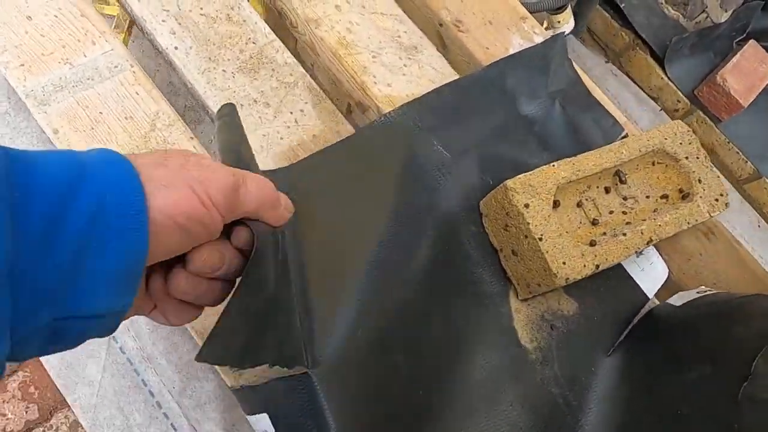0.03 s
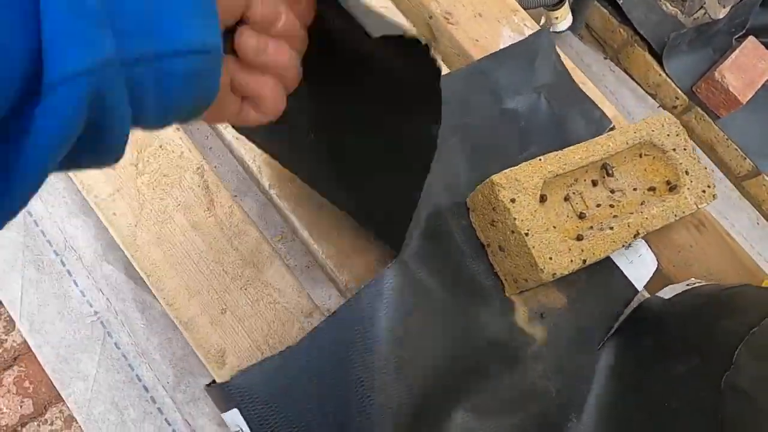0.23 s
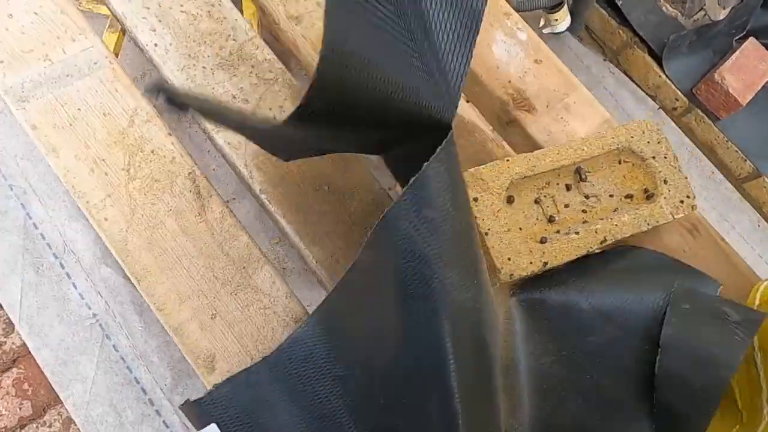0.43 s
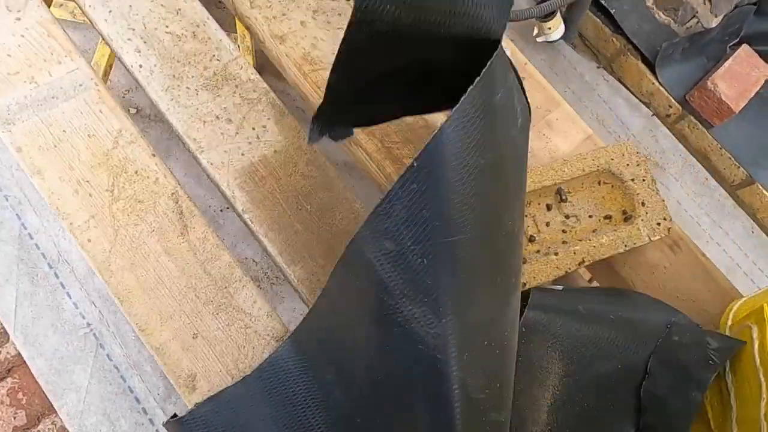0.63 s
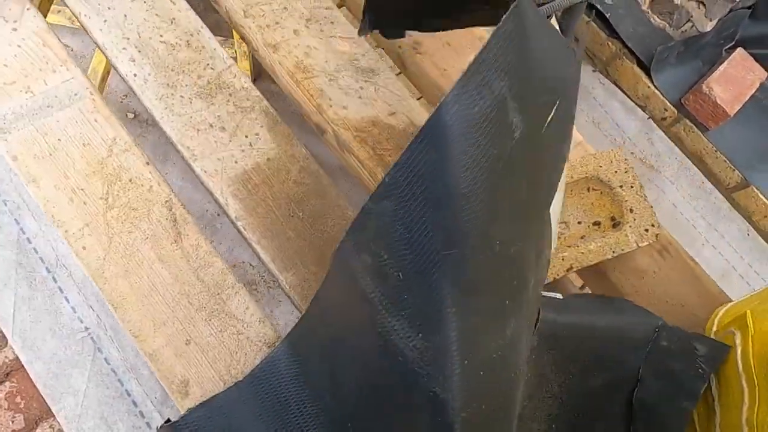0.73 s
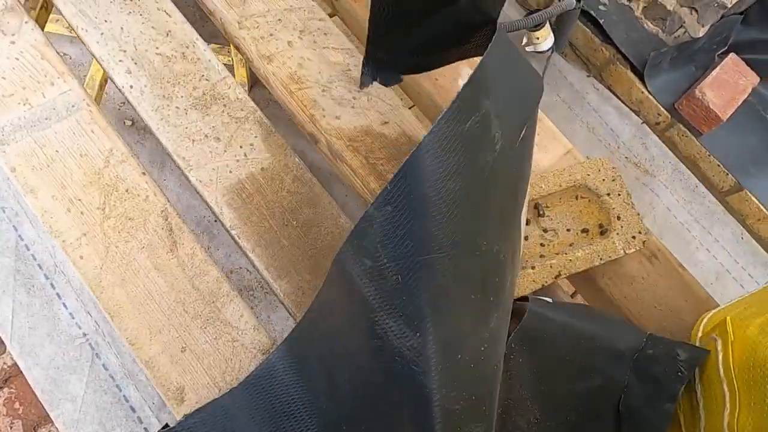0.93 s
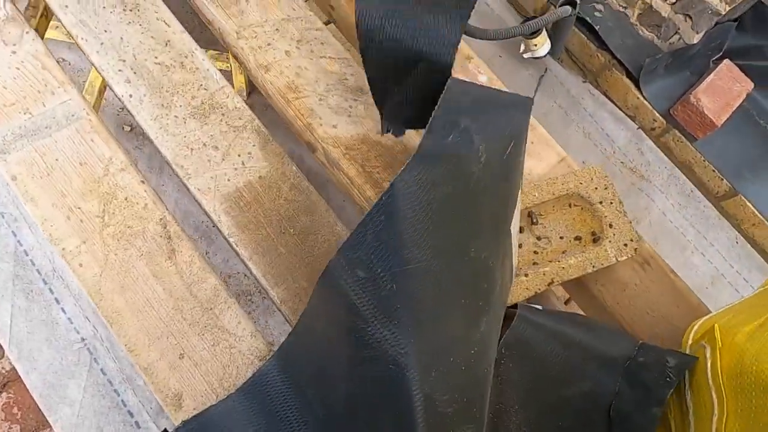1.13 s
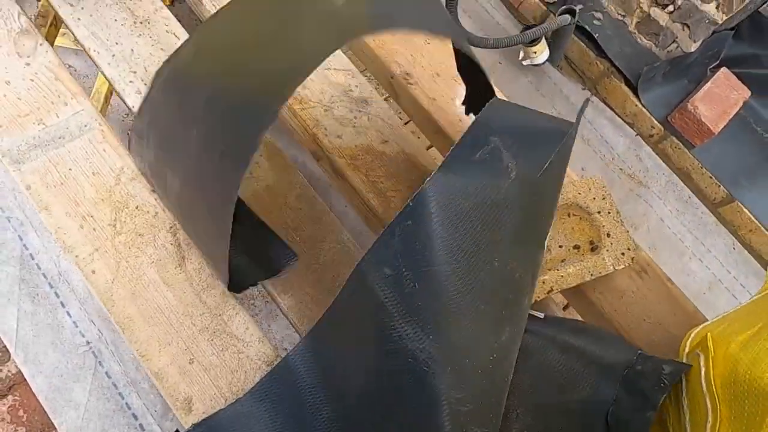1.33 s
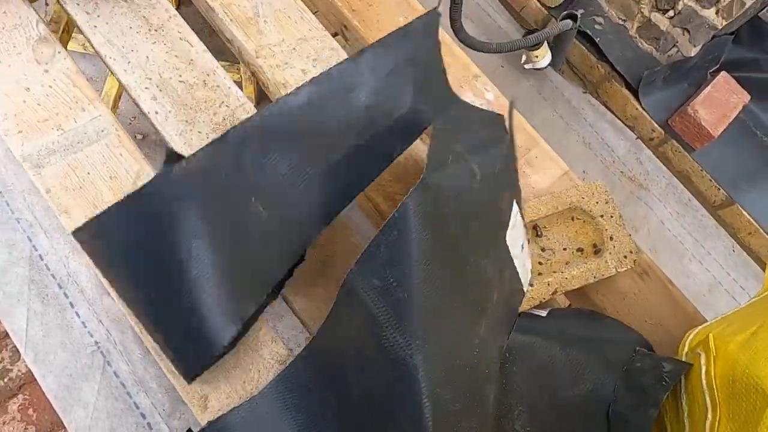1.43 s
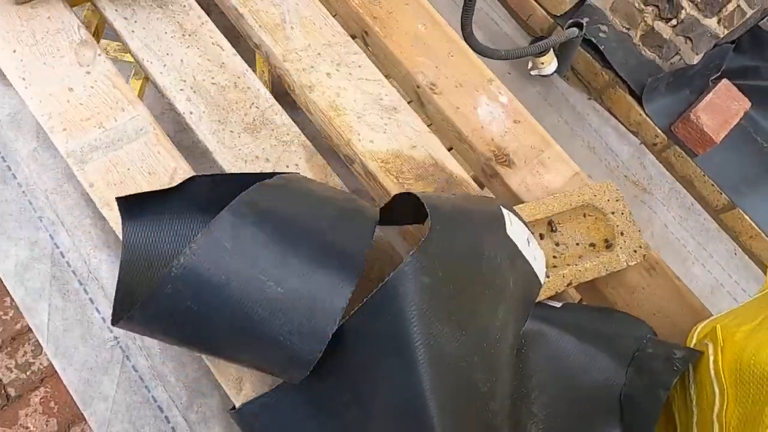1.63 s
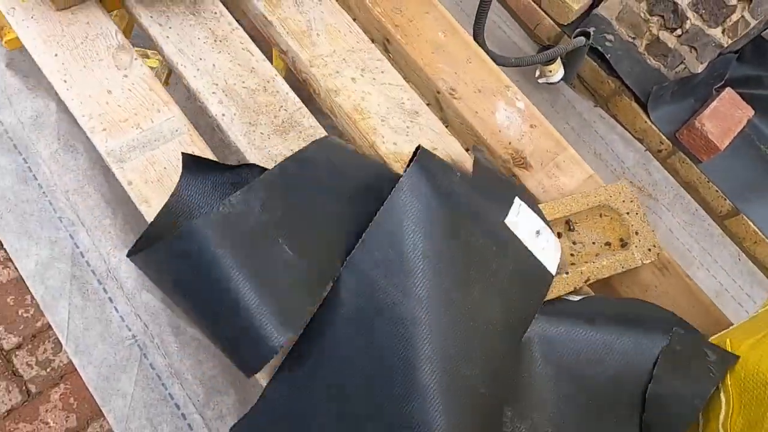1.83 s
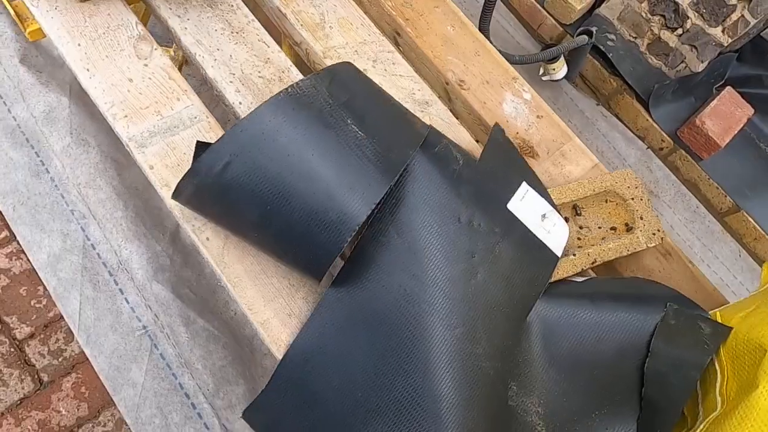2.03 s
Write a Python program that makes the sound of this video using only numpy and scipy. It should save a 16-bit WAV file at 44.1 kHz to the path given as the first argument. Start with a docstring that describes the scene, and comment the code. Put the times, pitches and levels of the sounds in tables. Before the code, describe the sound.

Stiff plastic sheet dragged from under a brick, juddering and crackling, then slapping onto wooden boards

```python
"""Stiff membrane dragged off a pallet

A stiff black plastic membrane is pulled from under a brick on a wooden pallet, outdoors in wind.
It rubs, then judders in stick-slip runs: crunchy clicks that kick its low modes into a boom.
The runs thin to single catches. Let go, it slaps on the boards (filtered clicks with a ring),
flops over (sinking sines), then slides and snags (swelling friction noise, crackles).
Noise tails give the echoes; filtered noise gives the wind and the far hum."""
import sys
import numpy as np
from scipy import signal
from scipy.fft import rfft, irfft, next_fast_len
from scipy.io import wavfile

SR = 44100
rng = np.random.default_rng(int(sys.argv[2]) if len(sys.argv) > 2 else 0)


def master(y):
    """Save y as 16-bit WAV."""
    cut = np.clip(np.atleast_2d(y).T, -1, 1)
    pcm = np.round(cut * 32767)  # scale
    wavfile.write(sys.argv[1], SR, pcm.astype(np.int16))


N = 91948
T = np.arange(N) / SR  # t/s

# All levels are relative: each layer passes further gains on its way out.
# fast stick-slip runs: start t/s, length t/s, slip rate f/Hz, click level/dB, boom level/dB,
# fade over the run level/dB (positive fades, negative grows)
JUDDERS = [(0.2579, 0.05384, 129.5, -9.5, -2, -6.5), (0.3232, 0.05025, 115, 3, 3.5, 0),
           (0.38, .022, 125, -2.5, 1.5, -1.5), (0.485, 0.1044, 119.4, 1.5, -5, 3.5)]
# single catches of the sheet on the brick: t/s, click level/dB, boom level/dB
CATCHES = [(.2422, 3, -9.5), (.251, -17.5, -3), (.407, 0, -0.5), (.421, -9.5, -0.5), (.432, -2.5, -9.5),
           (.4742, 4, -2.5), (.5133, -6.5, -28.5), (.5938, -23, -37), (.608, 0.5, -12.5), (.6233, 1, -13.5),
           (.6343, 0, -9.5), (.6388, -25.5, -38), (.6565, -3, -15.5), (.6995, 3, -14.5), (.7155, 0, -17),
           (.7298, 0, -10.5), (.7434, -0.5, -12), (.758, -6.5, -19), (.7703, -3, -8.5), (.7778, 1, -11.5),
           (.7815, -3, -19), (.7957, 3, -27.5), (.8123, -2, -17.5), (.83, -3, -26.5), (.842, -2, -33),
           (.8468, 1.5, -13.5)]
SLIP_DB, BOOM_DB = 8, -15
SLIP_JITTER_S, SLIP_SPREAD_DB = 0.0007, 1  # standard deviations inside a run
REBOUND_S, REBOUND_DB = 0.0042, -14  # in a run each slip is followed by a weaker one
CRUNCH_S = 0.001835  # decay time constant
TAUT_CRUNCH_DB, SLACK_CRUNCH_DB = 3, -4
CRUNCH_LIKENESS = 0.7  # share of the previous crunch kept in the next
# colour of a slip on the taut sheet, then on the slack sheet: f/Hz, level/dB
TAUT_COLOUR = [(100, -3), (400, 3.5), (700, -3.5), (1100, 3), (1550, -4.5), (2200, -0.5), (3300, -8.5),
               (4200, -5.5), (5200, -18.5), (6600, -18), (9500, -31), (15000, -54.5)]
SLACK_COLOUR = [(100, 3), (250, 6.5), (480, -5), (650, 10.5), (1180, 5.5), (1420, -6), (2200, -5),
                (2900, -9), (3500, -0.5), (4300, -16), (5100, -7.5), (5800, -23.5), (15000, -61)]
# when the sheet starts and ends going slack: t/s, t/s
SLACKENS_S = (0.434, 1)
# low modes of the sheet: f/Hz, level/dB, t60 t/s
SHEET_MODES = [(119, 0, 0.013), (171.4, 2.5, 0.0753), (204.6, -2.5, 0.0932), (274, -8, 0.1),
               (375, -17.5, 0.078)]
# gliding resonance of the taut sheet: t/s, f/Hz
SQUEAK_GLIDE = [(.17, 3400), (.21, 3760), (.265, 3110), (.3, 2250), (.345, 2373), (.475, 2620), (.54, 2110)]
SQUEAK_DB, SQUEAK_WIDTH_HZ = -1, 239
SLIP_LAG, SLAP_LAG = 0.8747, 0.815  # allpass coefficients; bending waves: highs arrive before lows

# first rub under the hand: t/s, level/dB; its colour: f/Hz, level/dB
RUB_LEVEL = [(0, -39), (.05, -33.5), (.09, -36.5), (.113, -26), (.147, -34.5), (.168, -27), (.218, -31),
             (.236, -39)]
RUB_COLOUR = [(200, 8), (550, -5), (950, 2.5), (1500, -1.5), (1800, -7), (2600, 0.5), (3000, -2.5),
              (3800, -6.5), (5000, -15), (6200, -21.5), (8000, -24), (15000, -50.5)]
# friction hiss of the drag over the brick: t/s, level/dB; its colour: f/Hz, level/dB
DRAG_LEVEL = [(.238, -55), (.262, -15), (.32, -20.5), (.42, -29.5), (.476, -20.5), (.51, -31), (.57, -36.5),
              (.595, -53), (.655, -40), (.668, -25), (.695, -32), (.72, -39), (.85, -45.5), (1, -50.5)]
DRAG_COLOUR = [(200, 15), (700, 6), (1500, -1), (2400, 4.5), (3500, -1), (5200, -5), (6600, -8.5),
               (9500, -22.5), (12500, -25), (15500, -56.5)]
# strokes of the loose sheet sliding on the wood:
# peak t/s, rise t/s, fall t/s, scrape level/dB, hiss level/dB
STROKES = [(1.279, 0.0394, 0.055, -51.5, -47), (1.055, 0.00564, 0.0081, -30, -41.5),
           (1.075, 0.013, 0.0072, -31.5, -37), (1.362, 0.0118, 0.009, -38.5, -32.5),
           (1.389, 0.0186, 0.0092, -31.5, -37), (1.47, 0.0218, 0.0372, -35.5, -32),
           (1.547, 0.033, 0.02, -36.5, -34.5), (1.59, 0.025, 0.0193, -57, -31.5),
           (1.654, 0.0223, 0.138, -40, -37.5), (1.697, 0.0066, 0.0047, -29, -28),
           (1.834, 0.0099, 0.162, -47, -35.5), (1.897, 0.0104, 0.0237, -28.5, -58),
           (1.981, 0.233, 0.0762, -33, -36.5)]
SCRAPE_DB, HISS_DB = 1, -1.5
# colours of the scrape and of the hiss: f/Hz, level/dB
SCRAPE_COLOUR = [(100, -17), (250, 4), (450, -5), (750, -0.5), (1300, -6), (2000, -10.5), (3000, -9),
                 (8000, -50.5)]
HISS_COLOUR = [(800, -14.5), (1600, 7), (3200, 1), (4500, 1), (6500, -5.5), (8300, -11), (10000, -20),
               (12500, -24.5), (15500, -38.5)]
GRAINS_PER_S, GRAIN_SPREAD_DB, GRAIN_Q = 3500, 2.5, 5.64
FLUTTER_PER_S = 140  # random gain points per second

# edges slap on the boards: t/s, level/dB, ring f/Hz, ring level/dB, rattle decay t/s,
# rattle level/dB, brightness level/dB per octave
SLAPS = [(1.1, -16.5, 356, -6.5, 0.00128, 4.5, -5), (1.178, -26, 886, 26, 0.00193, 7, 7),
         (1.449, -2, 1245, 4.5, 0.0021, 2.5, -1), (1.4546, -11.5, 1204, 21, 0.0078, 6, 2.5),
         (1.549, -11, 858, 3.5, 0.0026, 3, -3), (1.64, 0.5, 2474, -8, 0.00097, 0.5, -2),
         (1.714, -1, 2600, 8, 0.00051, -2, 0), (1.7296, -12, 2500, 8, 0.0024, 6.5, -2.5),
         (1.8061, -5, 1352, 11.5, 0.002, 1, 1.5)]
SLAP_DB = 9.5
# colour shared by the slaps: f/Hz, level/dB
SLAP_COLOUR = [(150, 1), (600, -2), (1200, -0.5), (2400, 2), (4000, -7), (7500, -16), (10000, -25),
               (15000, -37)]
# the sliding edge snags: t/s, level/dB
SNAGS = [(1.394, 2.5), (1.834, -1), (1.8844, 6.5), (1.8994, 5), (1.9133, 2.5), (2.052, 3)]
SNAG_S = 0.00196  # decay time constant
# folds flop over and push air: t/s, level/dB, settled f/Hz, t60 t/s
FLOPS = [(.488, -17, 150, .04), (.5875, -10.5, 166, .07), (1.1, -15, 135, .024), (1.489, -25, 160, .04),
         (1.548, -11, 175, .03), (1.646, -28, 170, .08), (1.987, -12.5, 175, .028)]
# time constants of swell and sag; a flop starts sharp by this share, then sags
FLOP_ATTACK_S, FLOP_SAG_S, FLOP_SHARP = 0.00209, 0.00784, 0.3186

# ground and pallet echoes
ECHO_DB, ECHO_T60_S = -9, 0.1018
# colour of the scatter that differs between the sides: f/Hz, level/dB
SCATTER_COLOUR = [(100, -59.5), (400, -34.5), (1000, -11.5), (4000, -15), (8000, 0)]
LEFT_LAG_S = 0.000033
# colour of the left side: f/Hz, level/dB
LEFT_COLOUR = [(100, 0), (8000, -1.5), (12000, -5.5)]
# wind on the microphone: t/s, level/dB
WIND_LEVEL = [(0, -30.5), (.45, -40), (.95, -44.5), (1.4, -39.5), (1.6, -32), (1.8, -31), (1.97, -24.5),
              (2.085, -28)]
# colour of the wind, then of its part that differs between the sides: f/Hz, level/dB
WIND_COLOUR = [(12, -9.5), (30, 4.5), (60, -0.5), (90, 1.5), (140, -2.5), (220, -14.5), (400, -18),
               (1500, -61.5)]
WIND_SIDE_COLOUR = [(25, -4.5), (60, -5.5), (140, -14.5)]
SITE_DB = -43
# colour of the far hum and hiss: f/Hz, level/dB
SITE_COLOUR = [(30, -30), (145, 13), (230, -5.5), (450, -19.5), (850, -10.5), (4000, -30), (15000, -52)]
TOP_STOP_HZ = 16500  # the top cut is fully down from here


def slip_times_and_levels():
    """Catches stand alone; a run repeats slips at a nearly even rate, each with a weak rebound."""
    slips = list(CATCHES)
    for start, length, rate, click_db, boom_db, fade_db in JUDDERS:
        chance = rng.standard_normal((32, 3))
        for s, (shift, strong, rebound) in zip(np.arange(0, length, 1 / rate), chance):
            at = start + s + SLIP_JITTER_S * shift
            change_db = SLIP_SPREAD_DB * strong - fade_db * s / length
            slips.append((at, click_db + change_db, boom_db + change_db))
            rebound_db = click_db + change_db + REBOUND_DB + SLIP_SPREAD_DB * rebound
            slips.append((at + REBOUND_S, rebound_db, -np.inf))  # a rebound does not boom
    return sorted(slips)


def stick_slip():
    """Each slip clicks much like the last and kicks the low modes; slackening changes the colour."""
    slips = slip_times_and_levels()
    clicks, kicks = np.zeros((2, N)), np.zeros(N)
    crunch = burst(CRUNCH_S)
    for s, click_db, boom_db in slips:
        fresh = np.sqrt(1 - CRUNCH_LIKENESS ** 2) * burst(CRUNCH_S)
        crunch = CRUNCH_LIKENESS * crunch + fresh
        crunch_db = np.interp(s, SLACKENS_S, [TAUT_CRUNCH_DB, SLACK_CRUNCH_DB])
        click = np.array([from_db(crunch_db) * crunch, burst(CRUNCH_S)])
        click[0, 0] += 1
        add(clicks, s, from_db(SLIP_DB + click_db) * click)
        add(kicks, s, from_db([BOOM_DB + boom_db]))
    slack = np.interp(T, SLACKENS_S, [0, 1])
    taut_clicks = squeak(colour(clicks * (1 - slack), TAUT_COLOUR))
    slack_clicks = colour(clicks * slack, SLACK_COLOUR)
    out = disperse(taut_clicks + slack_clicks, SLIP_LAG, count=7)
    out[0] -= sum(from_db(db) * ring(kicks, hz, t60) for hz, db, t60 in SHEET_MODES)
    return out


def squeak(x):
    """The taut sheet favours one narrow band, which glides as the bend changes."""
    glide_hz = np.interp(T, *np.transpose(SQUEAK_GLIDE))
    turn = np.exp(2j * np.pi * np.cumsum(glide_hz) / SR)
    r = np.exp(-np.pi * SQUEAK_WIDTH_HZ / SR)
    # shift the band down to 0 Hz, low-pass it, shift it back
    band = turn * signal.lfilter([1 - r], [1, -r], x / turn + 1e-18)
    return x + from_db(SQUEAK_DB) * 2 * np.real(band)


def rubbing():
    """The sheet rubs under the hand and drags over the brick, both through the squeak band."""
    rub = level(RUB_LEVEL) * friction(RUB_COLOUR, smooth_db=5, flutter_db=3)
    drag = level(DRAG_LEVEL) * friction(DRAG_COLOUR, smooth_db=2.5, flutter_db=1)
    return squeak(rub + drag)


def sliding():
    """The loose sheet slides on the boards in swelling strokes of scrape and hiss."""
    scrape, hiss = 0, 0
    for s, rise_s, fall_s, scrape_db, hiss_db in STROKES:
        swell = np.exp(-np.maximum((s - T) / rise_s, (T - s) / fall_s))
        # overlapping strokes add as powers
        scrape = np.hypot(scrape, from_db(SCRAPE_DB + scrape_db) * swell)
        hiss = np.hypot(hiss, from_db(HISS_DB + hiss_db) * swell)
    scraping = scrape * friction(SCRAPE_COLOUR, smooth_db=-7, flutter_db=1)
    return scraping + hiss * friction(HISS_COLOUR, smooth_db=2, flutter_db=2.5)


def friction(spectrum, smooth_db, flutter_db, count=20):
    """Tiny uneven contacts, each ringing a few cycles, over smooth hiss: (direct, scattered)."""
    sizes = from_db(GRAIN_SPREAD_DB * np.minimum(rng.exponential(1, N), 4))
    sizes = sizes * rng.choice([-1, 1], (2, N))
    clicks = sizes * (rng.random(N) < GRAINS_PER_S / SR)
    dealt = rng.integers(0, count, N)  # which pitch each contact gets
    grains = 0
    for k, hz in enumerate(np.geomspace(400, 14000, count)):
        grains = grains + resonance(clicks * (dealt == k) + 1e-18, hz, hz / GRAIN_Q)
    unsteady = flutter(flutter_db)
    smooth = from_db(smooth_db) * rng.standard_normal((2, N))
    return rms_one(colour(unsteady * (rms_one(grains) + smooth), spectrum))


def flutter(depth_db):
    """Random unsteadiness of a rubbing contact, as a gain."""
    steps = rng.standard_normal(4096)
    return from_db(depth_db * np.interp(T * FLUTTER_PER_S, np.arange(len(steps)), steps))


def slaps():
    """An edge hits a board, rattles and rings briefly at its own pitch."""
    out = np.zeros((2, N))
    for s, db, hz, ring_db, rattle_s, rattle_db, tilt_db in SLAPS:
        tilted = [(f, g + tilt_db * np.log2(f / 2000)) for f, g in SLAP_COLOUR]
        hit = colour(contact(rattle_s, rattle_db), tilted)
        ringing = from_db(ring_db) * resonance(hit, hz, width_hz=105.5)
        add(out, s, from_db(SLAP_DB + db) * (hit + ringing))
    return disperse(out, SLAP_LAG, count=2)


def snags():
    """The sliding edge snags on the rough wood with a short, dull crackle."""
    out = np.zeros((2, N))
    for s, db in SNAGS:
        add(out, s, from_db(db) * contact(SNAG_S, crunch_db=1.5))
    return disperse(colour(out, SCRAPE_COLOUR), SLAP_LAG, count=2)


def flops():
    """A fold turning over gives a soft, low, quickly damped swing that sinks in pitch."""
    out = np.zeros((2, N))
    for s, db, hz, t60 in FLOPS:
        pitch_hz = hz * (1 + FLOP_SHARP * np.exp(-T / FLOP_SAG_S))
        phase = 2 * np.pi * np.cumsum(pitch_hz) / SR
        attack = 1 - np.exp(-T / FLOP_ATTACK_S)
        add(out[0], s, from_db(db - 60 * T / t60) * attack * 2 * np.sin(phase))
    return out


def outdoors(sound):
    """Short echoes off pallet and ground; sound reaches the left side a little later and duller."""
    tail = burst(ECHO_T60_S / np.log(1000))
    direct, scattered = sound + from_db(ECHO_DB) * convolve(sound, tail)
    side = colour(scattered, SCATTER_COLOUR)  # the part that differs between the two sides
    late = np.interp(T - LEFT_LAG_S, T, direct + side)
    return np.array([colour(late, LEFT_COLOUR), direct - side])


def wind():
    """Low buffeting from filtered noise, less alike on the two sides the deeper it is."""
    mid, side = (rms_one(colour(x, WIND_COLOUR)) for x in rng.standard_normal((2, N)))
    side = colour(side, WIND_SIDE_COLOUR)
    return level(WIND_LEVEL) * np.array([mid + side, mid - side])


def site():
    """Steady far hum and hiss of the open site, from filtered noise."""
    return from_db(SITE_DB) * rms_one(colour(rng.standard_normal((2, N)), SITE_COLOUR))


def contact(decay_s, crunch_db):
    """A click with a short crunch behind it: (direct, scattered)."""
    x = np.array([from_db(crunch_db) * burst(decay_s), burst(decay_s)])
    x[0, 0] += 1
    return x


def burst(decay_s, size=8192):
    """Dying noise of unit energy."""
    x = rng.standard_normal(size) * np.exp(-T[:size] / decay_s)
    return x / np.sqrt(np.sum(x ** 2))


def ring(x, hz, t60):
    """A mode: a unit click sets a decaying sine of starting height 1 ringing."""
    r, w = from_db(-60 / (t60 * SR)), 2 * np.pi * hz / SR
    return signal.lfilter([0, np.sin(w)], [1, -2 * r * np.cos(w), r * r], x + 1e-18)


def resonance(x, hz, width_hz):
    """Band resonance with gain 1 on top."""
    r = np.exp(-np.pi * width_hz / SR)
    top = np.array([1, 0, -1]) * (1 - r * r) / 2
    return signal.lfilter(top, [1, -2 * r * np.cos(2 * np.pi * hz / SR), r * r], x)


def disperse(x, lag, count):
    """A chain of allpasses: the sheet smears a click into a short falling chirp."""
    a = np.clip(lag, 0, .95)
    for _ in range(count):
        x = signal.lfilter([-a, 1], [1, -a], x + 1e-18)
    return x


def colour(x, points):
    """Causal (minimum-phase) filter with the given (f/Hz, level/dB) response."""
    size = 8192
    hz, db = np.transpose(points)
    grid = np.maximum(np.arange(size // 2 + 1) * SR / size, 1)
    gain = from_db(np.interp(np.log(grid), np.log(hz), db))
    cepstrum = irfft(np.log(gain))
    # fold the cepstrum onto positive time to make the response causal
    cepstrum[1:size // 2] *= 2
    cepstrum[size // 2 + 1:] = 0
    return convolve(x, irfft(np.exp(rfft(cepstrum))))


def convolve(x, response):
    """Pass every row of x through an impulse response."""
    size = next_fast_len(x.shape[-1] + len(response))
    return irfft(rfft(x, size) * rfft(response, size), size)[..., :x.shape[-1]]


def level(rows):
    """Gain from a (t/s, level/dB) curve, -120 dB outside it."""
    rows = np.array(rows)
    return from_db(np.interp(T, rows[:, 0], rows[:, 1], left=-120, right=-120))


def from_db(db):
    """Decibels to gain."""
    return 10 ** (np.asarray(db) / 20)


def rms_one(x):
    """Scale to unit rms."""
    return x / np.sqrt(np.mean(x ** 2) + 1e-20)


def add(out, s, x):
    """Mix x into out at time s."""
    i = int(np.clip(s * SR, 0, N - 1))
    out[..., i:i + x.shape[-1]] += x[..., :N - i]


def scene():
    """The membrane and the site around it, with wind on the microphone."""
    membrane = stick_slip() + slaps() + snags() + flops() + rubbing() + sliding()
    return outdoors(membrane + site()) + wind()


def record(dry):
    """The deepest rumble is shed, peaks are rounded and the top is cut."""
    rumble_cut = signal.butter(1, 15, "high", fs=SR, output="sos")
    top_cut = signal.cheby2(16, 70, TOP_STOP_HZ, fs=SR, output="sos")
    rounded = .8 * np.tanh(signal.sosfilt(rumble_cut, dry) / .8)
    return signal.sosfilt(top_cut, rounded)


dry = scene()
out = record(dry)
master(out)
```